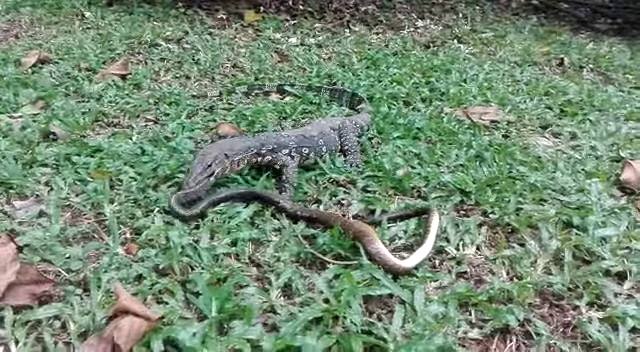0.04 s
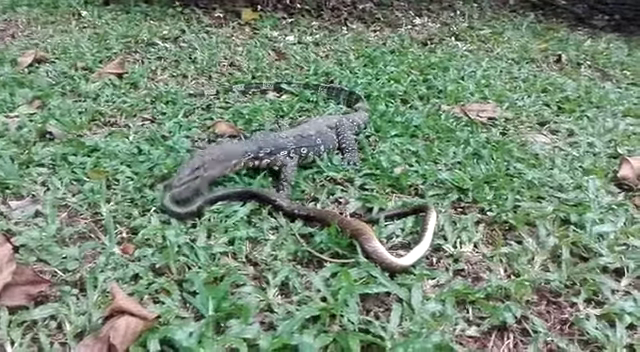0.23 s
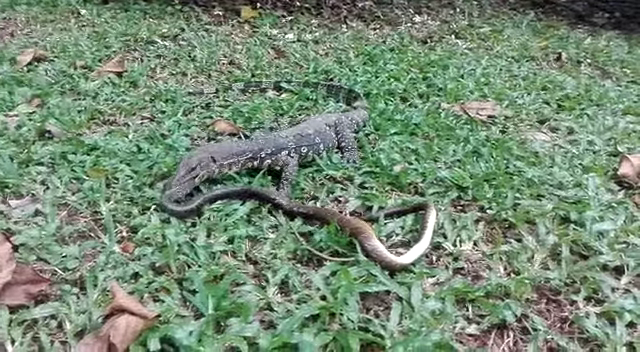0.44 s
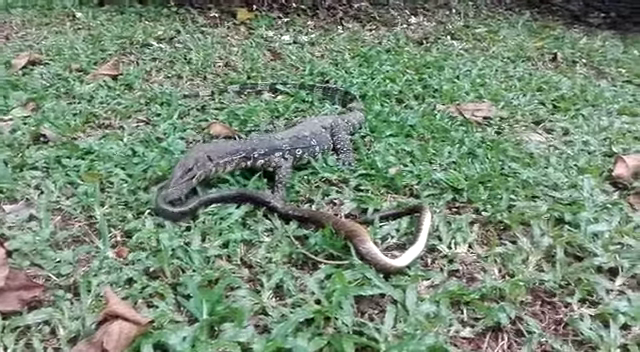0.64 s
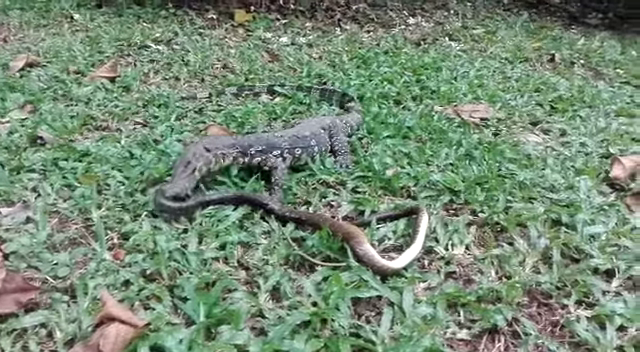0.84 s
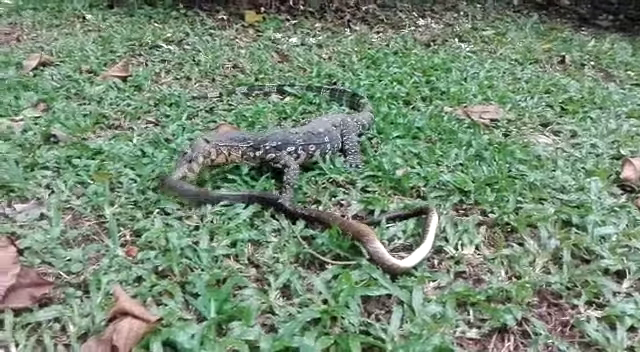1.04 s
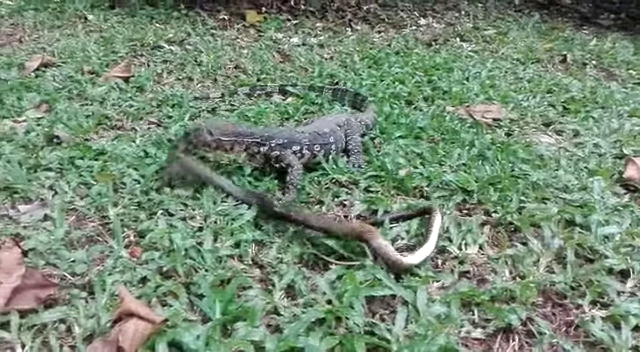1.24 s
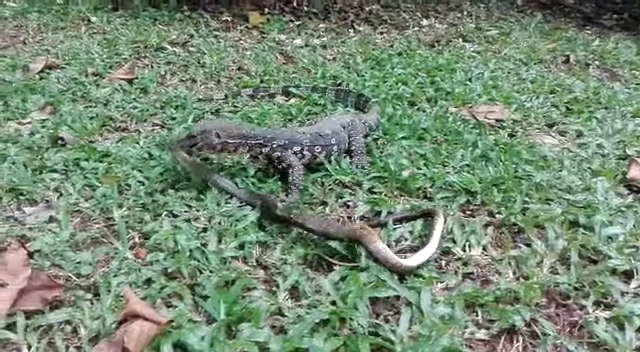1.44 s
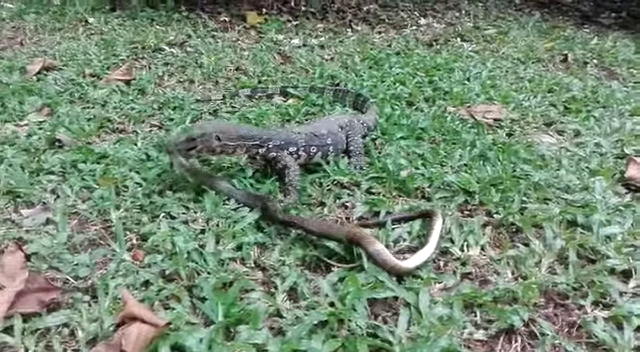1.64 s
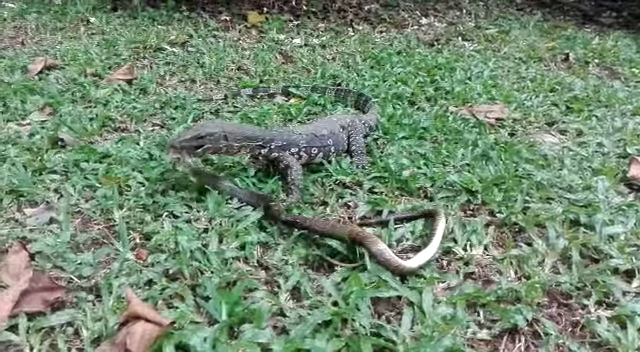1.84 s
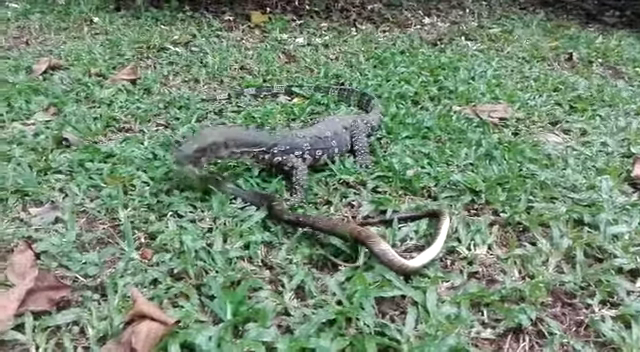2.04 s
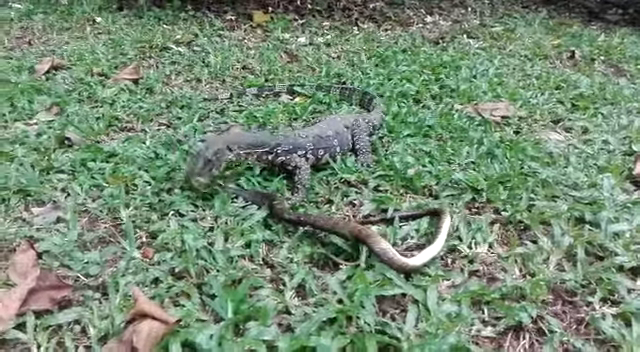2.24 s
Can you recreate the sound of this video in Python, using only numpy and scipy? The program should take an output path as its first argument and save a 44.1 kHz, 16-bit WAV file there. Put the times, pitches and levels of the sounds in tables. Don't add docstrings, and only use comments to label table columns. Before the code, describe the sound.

A sharp burst of compressed air roars and fades outdoors, over faint cicadas and low rumble

```python
import sys
import numpy as np
from scipy import signal
from scipy.fft import rfft, irfft, next_fast_len
from scipy.io import wavfile
from scipy.ndimage import uniform_filter1d, map_coordinates

SR = 44100
rng = np.random.default_rng(int(sys.argv[2]) if len(sys.argv) > 2 else 0)


def persist_wave(psi):
    counts = np.round(np.clip(psi, -1, 1) * 32767).astype(np.int16)
    wavfile.write(sys.argv[1], SR, np.atleast_2d(counts).T)


def gain_from_db(level_db):
    decades = np.asarray(level_db, float) / 20
    return 10 ** decades


N = 101429
T = np.arange(N) / SR

# time_s, level_db
JET_STRENGTH = [(.24, -30), (.31, -28.5), (.43, -31), (0.529, -35), (.66, -42.5), (.78, -49), (.93, -60),
                (1.0, -64.5), (1.04, -80)]
# pitch_hz, level_db (per Hz)
NOZZLE_COLOUR = [(330, -18.5), (600, -24), (1050, -7), (1600, -3), (3200, -4.5), (4400, -9), (8500, -12.5),
                 (14500, -31)]
# pitch_hz, loss_db (per dB of strength)
JET_FADING = [(100, 1.17), (300, 0.93), (550, 0.88), (1300, 1), (3000, 1.15), (8000, 1.31), (9000, 2.08),
              (13000, 2)]
# pitch_hz, width_hz, level_db
PIPE_NOTES = [(773, 16, 3.5), (864, 8.3, -13), (1296, 11, 5), (1525, 18, 4), (1519, 9.2, 1.5),
              (1776, 16, -8), (1840, 17.5, 5), (1960, 24, -9), (2415, 22, -5), (2740, 12, 4),
              (2980, 7.9, -15), (3200, 9.8, -0.5), (3520, 17, 1), (5280, 13, 0)]
# pitch_hz, level_db (per Hz)
THROB_COLOUR = [(15, -52), (25, -4.5), (103, 0.5), (188, -9), (214, -8.5), (314, -12), (400, -30),
                (520, -26), (880, -120)]
# pitch_hz, width_hz, level_db
GROUND_DIP = (2630, 580, -1.3)
# pitch_hz, time_s (to fall by 60 dB)
YARD_DECAY = [(200, 1.1), (1500, 1.66), (8000, 0.34)]
# time_s, level_db
CICADA_LEVEL = [(0, -69.5), (.6, -70.5), (1.1, -69), (1.4, -67.5), (1.415, -82), (1.56, -94), (1.58, -73.5),
                (1.9, -64.5), (2.3, -65.5)]
# time_s, chirps_per_s
CHIRP_RATE = [(0, 136), (1.41, 135.7), (1.57, 143.2), (2.3, 143.2)]
# pitch_hz, level_db (per Hz)
CHORUS_COLOUR = [(7900, -40), (8600, -3), (9200, -1.5), (9800, 2), (10200, -6), (10700, -3), (11400, -44)]
# time_s, level_db
CHORUS_LEVEL = [(0, 0.5), (.3, 0.5), (.7, -12), (1.4, -9), (1.49, -1), (1.55, 1), (1.7, 0.5), (2.3, -1)]
# start_s, length_s, pitch_hz, level_db, trill_depth (0-1)
PIP_NOTES = [(0.037, 0.03, 745, -61, 0), (0.051, 0.058, 745, -74, 0), (0.079, 0.34, 2930, -80, .5),
             (0.658, 0.092, 673, -59, .3), (0.64, 0.19, 531, -70, 0.4), (0.807, 0.061, 3530, -68.5, 0.4),
             (1.394, .04, 3600, -78.5, 0.5), (1.694, 0.21, 3356, -77.5, 0.3), (1.772, 0.14, 3304, -76, 0.5),
             (1.765, 0.15, 3640, -82, 0.7), (1.846, 0.044, 3364, -63, 0), (1.873, 0.2, 3354, -79.5, 0.5),
             (1.975, .072, 2004, -69.5, 0.7), (2.055, 0.037, 1960, -73.5, .7), (2.1, .07, 3350, -83.5, .6),
             (2.225, 0.015, 2740, -71, 0)]
# time_s, level_db
DRAG_LEVEL = [(1.0, -82), (1.03, -62), (1.08, -61), (1.13, -62.5), (1.19, -64), (1.24, -66), (1.27, -77),
              (1.32, -91)]
# pitch_hz, level_db (per Hz)
BLADE_COLOUR = [(3000, -50), (4500, -20), (9000, -14), (11000, -6), (11800, -3), (13200, -3), (14500, -4.5)]
# start_s, level_db, pitch_hz
STALK_TICKS = [(.667, -58, 12500), (1.018, -63, 8000), (1.19, -65, 8000), (1.69, -65, 9000),
               (1.935, -61, 12000), (2.056, -59, 13500)]
# time_s, level_db
GUST_LEVEL = [(0, -51.5), (.85, -51.5), (1.0, -41.5), (1.08, -49), (1.4, -58.5), (1.9, -56.5), (2.1, -60),
              (2.17, -40.5), (2.21, -57), (2.3, -54)]
# pitch_hz, level_db (per Hz)
WIND_COLOUR = [(12, -15), (25, 0.5), (55, -0.5), (90, -10.5), (160, -23), (300, -120)]
# pitch_hz, level_db (per Hz)
TRAFFIC_COLOUR = [(12, -37), (20, -14), (59, -1.5), (76, -8), (107, -5), (321, -21.5), (354, -26.5),
                  (600, -39.5), (780, -82), (1320, -120)]
# pitch_hz, level_db (per Hz)
AIR_COLOUR = [(300, -33), (420, -6), (600, -8), (900, -2), (1500, -4), (3000, -8), (5000, -12.5),
              (14500, -14.5)]

VALVE_S, OPEN_S = .2255, .014
PIPE_SHARE = 1.4
THROB_DB, THROB_RISE_S, THROB_END_S = -11, 0.034, .8
CHOKE_HZ, CHOKE_DB = 950, -10
YARD_DB = -21
CHIRP_FROM_HZ, CHIRP_TO_HZ = 10350, 8800
CHIRP_SHARE = .95
CHIRP_ROUGH, CHIRP_TAIL = .3, 2.2
CHORUS_DB = -72
TRILL_HZ, PIP_ROUGH = 62, 0.26
TICK_S = 0.0044
TRAFFIC_DB, AIR_DB = -56.5, -69
TOP_HZ = 14350


def unit(x):
    return x / np.sqrt(np.mean(x ** 2) + 1e-20)


def along(points, hz):
    f, v = np.transpose(points)
    return np.interp(np.log(hz + 1), np.log(f + 1), v)


def curve(rows):
    return np.interp(T, *np.transpose(rows))


def wobble(rate):
    return map_coordinates(rng.standard_normal(int(N * rate / SR) + 4), [T * rate])


def filtered(x, response):
    m = next_fast_len(N + 8192)
    return irfft(rfft(x, m) * response(np.fft.rfftfreq(m, 1 / SR)), m)[..., :N]


def rush(colour, patchy_db):
    z = signal.stft(rng.standard_normal(N), nperseg=512)[2]
    patches = uniform_filter1d(rng.standard_normal(z.shape), 5, 0)
    patches = uniform_filter1d(patches, 8, 1)
    noise = signal.istft(z * gain_from_db(patchy_db * unit(patches)), nperseg=512)[1][:N]
    return unit(filtered(noise, lambda hz: gain_from_db(along(colour, hz))))


def pipework(hz):
    ringing = 0
    for centre, width, db in PIPE_NOTES:
        resonance = hz * width / (centre * centre - hz * hz + 1j * hz * width)
        ringing = ringing + gain_from_db(db) * abs(resonance) ** 2
    dip_hz, dip_width, dip_db = GROUND_DIP
    dip = gain_from_db(dip_db * np.exp(-((hz - dip_hz) / dip_width) ** 2))
    return (1 + PIPE_SHARE * ringing) * dip


def throb():
    rise = (T - VALVE_S) / THROB_RISE_S + 0.71
    fall = (THROB_END_S - T) / 0.033
    envelope = np.clip(np.minimum(rise, fall), 0, 1)
    return gain_from_db(THROB_DB + 0.5 * wobble(23.85)) * envelope * rush(THROB_COLOUR, patchy_db=2.5)


def jet():
    air = unit(filtered(rush(NOZZLE_COLOUR, patchy_db=1.13), pipework)) + throb()
    hz, t, z = signal.stft(air, SR, nperseg=512)
    end_s = JET_STRENGTH[-1][0]
    s, db = np.transpose(JET_STRENGTH + [(end_s + 0.13, -130)])
    lost_db = np.interp(t, s, db - db.max())
    fading_db = lost_db * along(JET_FADING, hz)[:, None]
    choking = np.clip((t - THROB_END_S + 0.029) / 0.13, 0, 1)
    choke_db = CHOKE_DB * choking / (1 + (hz[:, None] / CHOKE_HZ) ** 10)
    air = signal.istft(z * gain_from_db(fading_db + choke_db), SR, nperseg=512)[1][:N]
    opening = 1 - np.exp(-np.clip(T - VALVE_S, 0, None) / OPEN_S)
    return gain_from_db(db.max() + 3.0) * air * opening


def yard(x):
    hz, t, z = signal.stft(rng.standard_normal(SR), SR, nperseg=256)
    decay = gain_from_db(-60 * t / along(YARD_DECAY, hz)[:, None])
    tail = signal.istft(z * decay, SR, nperseg=256)[1]
    return signal.fftconvolve(x, tail / np.linalg.norm(tail))[:N]


def cicada():
    cycles = np.cumsum(curve(CHIRP_RATE) * (1 + .004 * wobble(60))) / SR
    u = np.clip(cycles % 1 / CHIRP_SHARE, 0, 1)
    size = gain_from_db(0.59 * rng.standard_normal(size=500))[cycles.astype(int)]
    pitch = CHIRP_FROM_HZ + (CHIRP_TO_HZ - CHIRP_FROM_HZ) * u + 70 * wobble(400)
    shape = np.sin(np.pi * u) * np.exp(-CHIRP_TAIL * u)
    chirps = size * shape * (1 + CHIRP_ROUGH * wobble(1000))
    song = unit(chirps * np.sin(2 * np.pi * np.cumsum(pitch) / SR))
    return gain_from_db(curve(CICADA_LEVEL) + 0.72 * wobble(7.95)) * song


def chorus():
    return gain_from_db(CHORUS_DB + curve(CHORUS_LEVEL)) * rush(CHORUS_COLOUR, patchy_db=1.5)


def pips():
    out = np.zeros(N)
    for start, length, hz, db, depth in PIP_NOTES:
        u = np.clip((T - start) / length, 0, 1)
        swell = np.sin(np.pi * u) ** .5 * (u < 1)
        trill = 1 - depth * np.cos(2 * np.pi * TRILL_HZ * (T - start))
        rough = 1 + PIP_ROUGH * wobble(70)
        pitch = hz * (1 + .002 * wobble(60))
        tone = np.sin(2 * np.pi * np.cumsum(pitch) / SR)
        out += gain_from_db(db + 4.5) * swell * trill * rough * tone
    return out


def drag():
    grains = gain_from_db(1.6 * wobble(500) + .7 * wobble(40))
    return gain_from_db(curve(DRAG_LEVEL)) * unit(grains * rush(BLADE_COLOUR, patchy_db=1.5))


def ticks():
    out = np.zeros(N)
    for start, db, hz in STALK_TICKS:
        t = np.clip(T - start, 0, None)
        burst = (T >= start) * np.exp(-t / TICK_S) * rng.standard_normal(N)

        def stalk(f):
            ring = abs(f * 3000 / (hz * hz - f * f + 1j * f * 3000))
            return 0.6 * (f > 2500) + ring

        out += gain_from_db(db) * filtered(burst, stalk)
    return out


def wind():
    return gain_from_db(curve(GUST_LEVEL) - 3.5 + 1.3 * wobble(14)) * rush(WIND_COLOUR, patchy_db=1.8)


def background():
    traffic = gain_from_db(TRAFFIC_DB) * rush(TRAFFIC_COLOUR, patchy_db=1.5)
    return traffic + gain_from_db(AIR_DB) * rush(AIR_COLOUR, patchy_db=2.4)


def scene():
    air = jet()
    valve = air + gain_from_db(YARD_DB) * yard(air)
    insects = cicada() + chorus()
    lawn = drag() + ticks()
    return (valve + insects + pips() + lawn + wind() + background())[None]


def low_pass(x):
    return signal.sosfilt(signal.butter(12, 14770, fs=SR, output="sos"), x)


def record(dry):
    mix = filtered(dry, lambda hz: hz < TOP_HZ)
    return low_pass(mix)


dry = scene()
out = record(dry)
persist_wave(out)
```